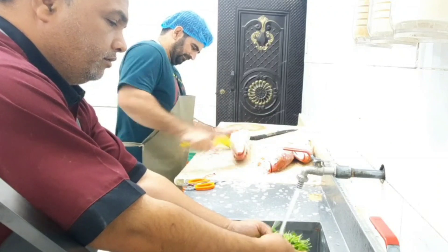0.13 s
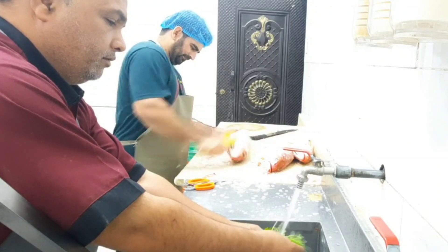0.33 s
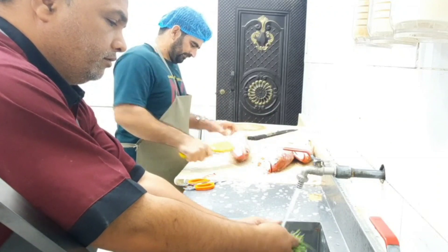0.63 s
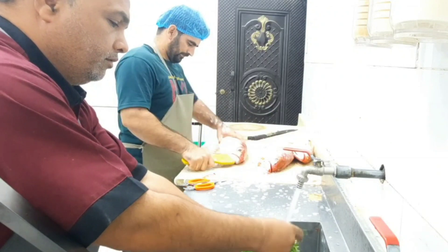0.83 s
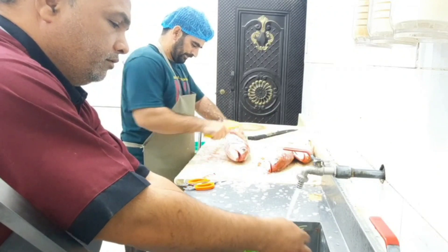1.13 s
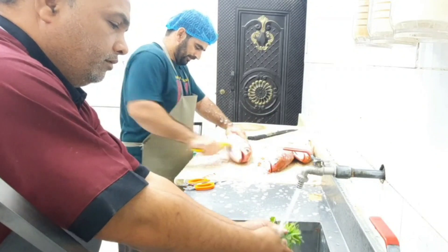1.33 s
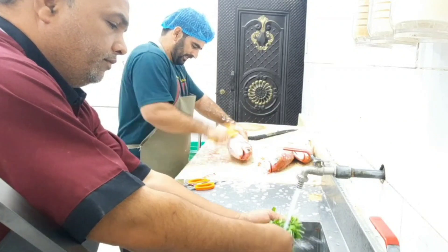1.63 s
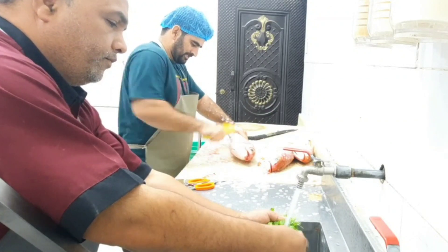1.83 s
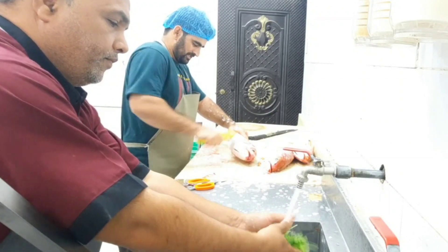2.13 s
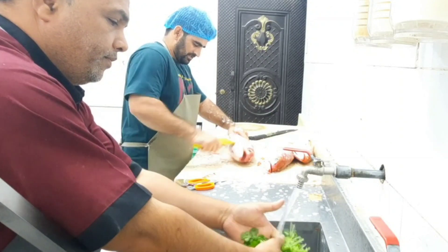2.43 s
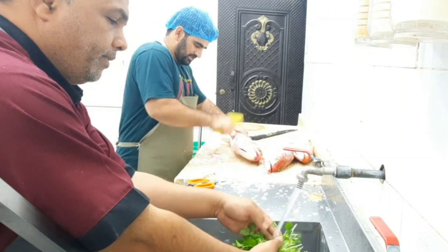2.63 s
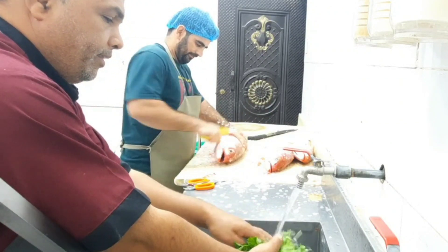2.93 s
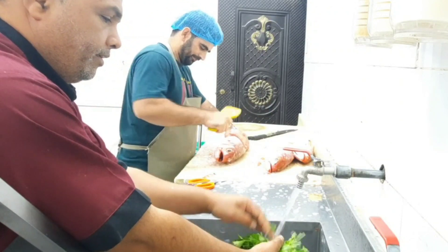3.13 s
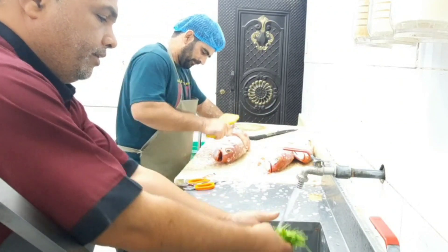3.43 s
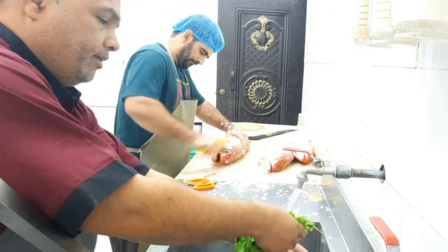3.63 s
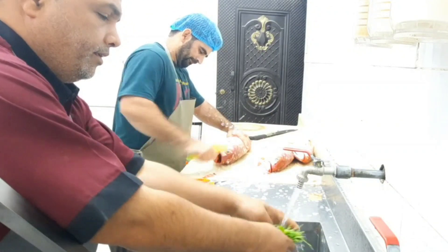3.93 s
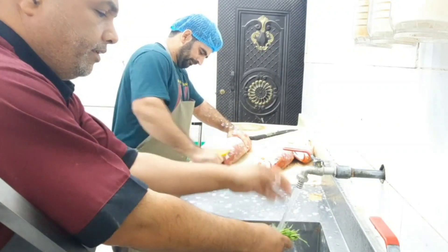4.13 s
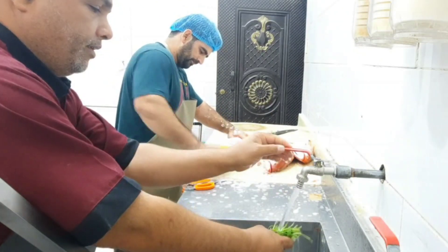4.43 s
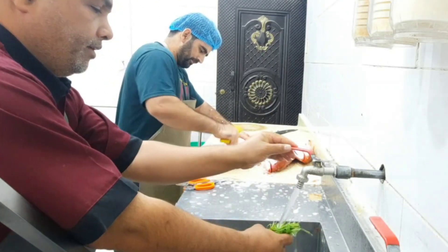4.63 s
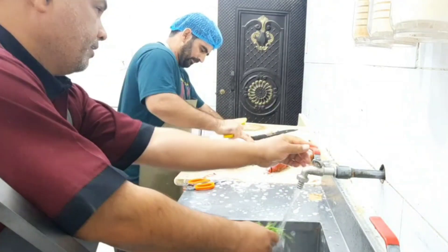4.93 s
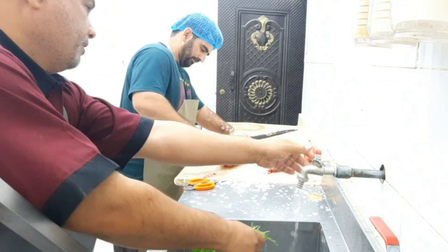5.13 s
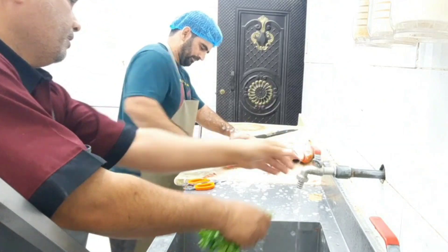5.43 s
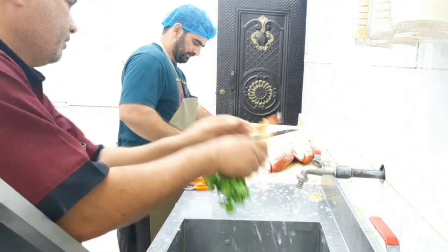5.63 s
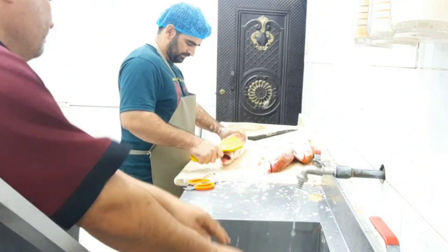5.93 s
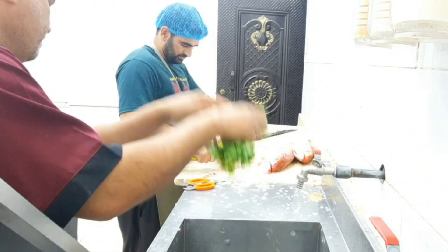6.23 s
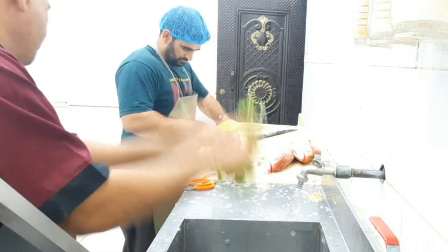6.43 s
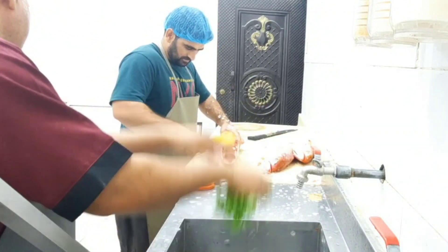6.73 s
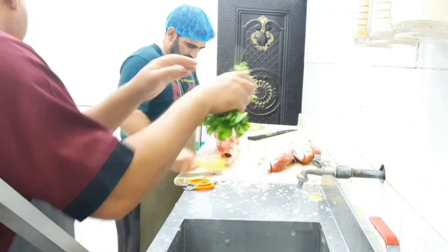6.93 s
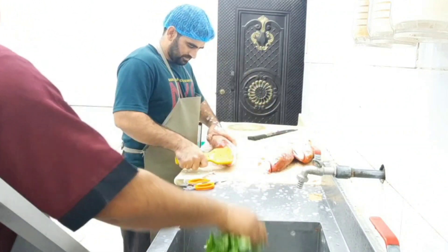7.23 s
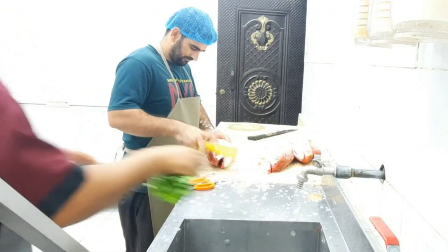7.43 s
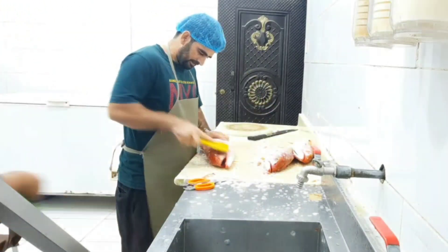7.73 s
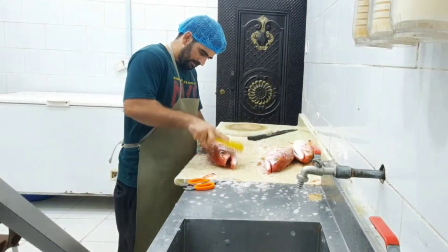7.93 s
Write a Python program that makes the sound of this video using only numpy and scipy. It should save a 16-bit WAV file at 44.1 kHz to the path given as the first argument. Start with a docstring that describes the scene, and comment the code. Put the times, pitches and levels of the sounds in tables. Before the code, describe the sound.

In a hard tiled room, running water patters and gurgles beside raspy fish-scaling strokes and thudding blows, then dribbles away before bursts of flung droplets.

```python
"""In a tiled fish shop a tap runs over a bunch of herbs into a steel sink, is shut, and the herbs are shaken dry.
Further off a hand scaler rasps and strikes a fish on a cutting board, and the table under it thuds.
A freezer hums over a low rush; a faint thin whistle comes late; a small microphone with a bright peak hears it all.
Water and scales are random clicks and damped sines, played through resonances and spectra.
The hard walls are decaying noise that rings on after every stroke."""
import sys
import numpy as np
from scipy import signal
from scipy.fft import rfft, irfft, next_fast_len
from scipy.io import wavfile
from scipy.ndimage import map_coordinates

SR = 44100
rng = np.random.default_rng(int(sys.argv[2]) if len(sys.argv) > 2 else 0)


def unload_wav(signal):
    """Save mono or channel-first audio to the path in sys.argv[1] as 16-bit WAV at rate SR, clipped to [-1, 1]."""
    wavfile.write(
        sys.argv[1],
        SR,
        np.round(np.clip(np.atleast_2d(signal).T, -1, 1) * 32767).astype(np.int16),
    )


N = 356769
TIME = np.arange(N) / SR
FREQS = np.fft.rfftfreq(8192, 1 / SR)

# resonances of the cutting board: pitch_hz, width_hz, level_db
BOARD_MODES = [(465, 41, -0.5), (670, 77, 4), (835, 110, 3.5), (1114, 178, 2), (1457, 510, -1.5),
               (1925, 580, -2.5), (2710, 300, -6.5)]
# resonances of the table top and frame: pitch_hz, width_hz, level_db
TABLE_MODES = [(55.5, 28, 1.5), (91.5, 50, 2), (148, 41, 1), (199.5, 32, 1.5), (245.3, 36, -2),
               (348, 77, -11), (440, 130, -15.5)]
# spectrum of teeth cracking on scales: freq_hz, level_db (per Hz)
CRACK_SPECTRUM = [(100, -21), (1000, -18.5), (3000, -26), (5000, -8.5), (8500, -4), (11000, -14),
                  (15000, -9)]
# spectrum of splashing water: freq_hz, level_db (per Hz)
SPLASH_SPECTRUM = [(100, -10), (400, -3.5), (800, 0), (2000, -7), (3500, -4), (6000, 3), (8000, 2),
                   (11000, -5.5), (15000, 3)]

# a pull with a rasp of FIRM_DB tears this many scales a second; the rate doubles every TEARS_DOUBLE_DB
TEARS_PER_S, FIRM_DB, TEARS_DOUBLE_DB, BOARD_UNDER_RASP_DB = 3200, -47, 6, -9
# the first bite of a pull, relative to its rasp; BITE_GROWS is dB more per dB of rasp, so a soft pull hardly bites
BITE_S, BITE_DB, BITE_GROWS = .006, 1, .5
TUG_TILT_DB = 1.5  # per octave: quick tugs favour the higher modes of the table
SNAP_HZ, SNAP_CYCLES = 8680, 2.26  # a snap decays to 1/e in this many cycles
KNOCK_WIDTH = 0.29  # bandwidth of the hollow knock over its pitch
SLAP_DB, BOARD_DB, THUD_DB = -1, 1.5, -4  # wet flesh, board and table, relative to the force of a blow
HEAVIEST_THUD_DB = -44  # the flesh cushions anything heavier
# the short drag after a blow
DRAG_AFTER_S, DRAG_S, DRAG_FADE_DB, DRAG_TILT_DB, DRAG_TEARS_PER_S = .014, 0.029, 3.5, 1, 1600
DRAG_BOARD_DB, DRAG_TABLE_DB = -13.5, -18  # relative to the force of the blow
SPLASH_DB, TINKLE_DB, DRUM_DB, GURGLE_DB = -3.5, -13, -8.5, -3  # share of each layer of the stream
SMALL_DROP_DB, SMALL_DROP_RANGE_DB = 5, 7  # the largest random drop over the splash, and the range below it
SMALL_DROP_HZ, SMALL_DROP_OCTAVES = 7000, 0.96  # middle pitch and full range
SPAT_S, SPAT_WIDTH, SPAT_FADE_DB_PER_S = .0047, 0.41, 900  # one drop: length, bandwidth over pitch, decay
BLIP_CYCLES, BLIP_RISE = 7.8, 0.066  # cycles to decay to 1/e, and the glide of a bubble
SPRAY_RISE_S, SLOSH_AFTER_S, SLOSH_S = 0.0047, 0.041, 0.015  # fine drops swell first; the bulk lands later
SIDE_DB = -61  # how much the two channels differ
TOP_HZ = 15900  # nothing passes the microphone from here up


def amp(db):
    """Decibels to gain."""
    return 10 ** (np.asarray(db) / 20)


def unit(x):
    """Scaled to rms 1."""
    return x / np.sqrt(np.mean(x ** 2) + 1e-20)


def lasting(x, seconds):
    """Scaled to the energy of an rms-1 sound of that length."""
    return x * np.sqrt(seconds * SR / (np.sum(x ** 2) + 1e-20))


def along(points, hz):
    """(Hz, value) points read on a log frequency axis."""
    f, v = np.transpose(points)
    return np.interp(np.log(hz + 1), np.log(f + 1), v)


def tilted(points, tilt_db):
    """A spectrum leaned by tilt_db an octave, pivoting at the sample rate."""
    return [(hz, db + tilt_db * np.log2(hz / SR)) for hz, db in points]


def wobble(rate):
    """A smooth random curve, rate knots a second, mirrored once its 400 knots run out."""
    return map_coordinates(rng.standard_normal(400), [TIME * rate], mode="mirror")


def colour(points):
    """Causal, minimum-phase impulse response with the given spectrum."""
    cepstrum = irfft(np.log(amp(along(points, FREQS))))
    half = len(cepstrum) // 2
    cepstrum[1:half] *= 2
    cepstrum[half + 1:] = 0
    return irfft(np.exp(rfft(cepstrum)))


def body(modes):
    """Impulse response of a set of resonances, with alternating signs."""
    response = 0
    for k, (hz, width, db) in enumerate(modes):
        damping = 1j * FREQS * width
        response = response + (-1) ** k * amp(db) * damping / (hz * hz - FREQS ** 2 + damping)
    return irfft(response)


def through(x, response):
    """x played through an impulse response."""
    return signal.fftconvolve(x, response)


def add(track, s, x):
    """Mix x into the track at time s."""
    start = int(np.clip(round(s * SR), 0, N - 1))
    track[start:start + len(x)] += x[:N - start]


def clicks(size, rate, spread_db):
    """Random impulses of log-normal strength, capped at two spreads, rate a second."""
    chance, strength = rng.random(size), rng.standard_normal(size)
    signs = rng.choice([-1, 1], size)
    return (chance < rate / SR) * signs * amp(spread_db * np.minimum(strength, 2))


def burst(length, fade_db, rate, spread_db):
    """A run of clicks that fades along its length (a negative fade swells) and then dies quickly."""
    t = np.arange(SR // 5) / SR
    fade = amp(-fade_db * np.minimum(t / length, 1))
    end = np.exp(-np.maximum(t - length, 0) / 0.004)
    return clicks(len(t), rate, spread_db) * fade * end


def ping(hz, cycles, glide):
    """Damped sines, one row per pitch, that fall to 1/e every so many cycles; glide lifts their pitch."""
    t = np.arange(SR // 30) / SR
    hz = np.reshape(hz, (-1, 1))
    age = t * hz / cycles
    wave = np.sin(2 * np.pi * hz * t * (1 + glide * np.minimum(age, 2)))
    return wave * np.exp(-age) * (1 - np.exp(-4 * age))


def room(x, wet_db, direct=(1,)):
    """Direct sound plus the tiles' answer: noise decaying at each pitch's own rate, a little held back at first."""
    # reverberation of the tiles: freq_hz, t60_s
    tile_decay = [(100, 0.52), (260, 0.92), (700, 0.56), (1800, 0.75), (4800, 0.63), (8500, 0.45),
                  (14000, 0.28)]
    hz, t, z = signal.stft(rng.standard_normal(SR), SR, nperseg=256)
    decay = amp(-60 * t / along(tile_decay, hz)[:, None])
    tail = signal.istft(z * decay, SR, nperseg=256)[1]
    tail *= 1 - 0.077 * np.exp(-np.arange(len(tail)) / SR / 0.049)
    response = amp(wet_db) * tail / np.linalg.norm(tail)
    response[:len(direct)] += direct
    return through(x, response)[:N]


def flow(t):
    """Levels of the splash and the gurgle at times t, in dB, before each layer's share."""
    # the stream while the tap runs: time_s, splash_db, gurgle_db
    running = [(0.0, -52, -56), (0.09, -54, -54.5), (0.84, -54, -68.5), (1.28, -55, -59.5),
               (1.49, -51.5, -60.5), (1.78, -54, -71), (2.33, -53, -60.5), (2.59, -57, -69),
               (3.6, -53, -65), (3.75, -54.5, -61), (4.03, -50.5, -65), (4.49, -61, -62.5), (5.1, -50, -63),
               (5.32, -50, -58.5), (5.5, -52, -69)]
    # the dribble once it is shut: time_s, splash_db, gurgle_db
    dribbling = [(5.68, -61, -68.5), (6.54, -78.5, -82), (6.88, -72, -75), (7.36, -68.5, -78.5),
                 (7.7, -70.5, -78.5), (8.09, -66, -84)]
    s, *levels = np.transpose([*running, *dribbling])
    return [np.interp(t, s, level) for level in levels]


def bubbling(count, hz, spread, cycles):
    """Bubbles of random time, size and pitch, rms 1."""
    out = np.zeros(N)
    when = rng.random(count) * N / SR
    pitch, size = rng.standard_normal((2, count))
    rings = ping(hz * np.exp(spread * np.clip(pitch, -2, 2)), cycles, glide=.02)
    gains = amp(3.5 * np.minimum(size, 2))
    for start, gain, ring in zip(when, gains, rings):
        add(out, start, gain * ring)
    return unit(out)


def tap():
    """The stream breaks into clumps of droplets, traps bubbles between the leaves and drums on the basin."""
    # spectrum of the basin under the stream: freq_hz, level_db (per Hz)
    drum_spectrum = [(25, -50), (50, -3), (90, -4), (140, -10), (220, -30.5), (450, -25), (800, -36)]
    splash_db, gurgle_db = flow(TIME)
    clumps = amp(3.16 * wobble(rate=32) + 4.2 * wobble(rate=150))
    droplets = clicks(N, rate=4000, spread_db=2.5) * clumps
    splash = amp(splash_db + SPLASH_DB) * unit(through(droplets, colour(SPLASH_SPECTRUM))[:N])
    # small bubbles tinkle, large ones gurgle
    tinkle = amp(splash_db + TINKLE_DB) * bubbling(count=1200, hz=6600, spread=.2, cycles=5)
    gurgle = amp(gurgle_db + GURGLE_DB) * bubbling(count=2600, hz=1700, spread=.4, cycles=3.5)
    hits = clicks(N, rate=550, spread_db=4.5)
    drum = amp(splash_db + DRUM_DB) * unit(through(hits, colour(drum_spectrum))[:N])
    return room(splash + tinkle, wet_db=-5.0) + room(gurgle, wet_db=-5.0) + drum


def freezer():
    """Motor hum, unsteady in level and phase, over the low rush of the shop."""
    # hum of the motor: pitch_hz, level_db (rms)
    hum_tones = [(58, -76), (120, -74), (232, -78.5)]
    # spectrum of the rush: freq_hz, level_db (per Hz)
    rush_spectrum = [(20, -23), (35, -1.5), (55, -1.5), (80, -5), (130, -2), (230, -13), (400, -14.5),
                     (600, -25.5), (1500, -40.5), (4000, -32.5), (15000, -32)]
    hum = np.zeros(N)
    for hz, db in hum_tones:
        level = amp(db + 0.91 * wobble(rate=2.3)) * np.sqrt(2)
        hum += level * np.sin(2 * np.pi * hz * TIME + .5 * wobble(rate=6.5))
    rush = unit(through(rng.standard_normal(N), colour(rush_spectrum))[:N])
    return hum + amp(-65.5) * rush


def scrape(length, fade_db, tilt_db, rate, rasp_db, board_db, table_db):
    """Teeth tear through rows of scales; their tugging shakes board and table."""
    # spectrum of tearing scales: freq_hz, level_db (per Hz)
    rasp_spectrum = [(100, -29), (600, -12), (1400, -7.5), (3000, -7), (5500, 4), (8500, -1), (11000, -4.5),
                     (15000, -0.5)]
    rasp = colour(tilted(rasp_spectrum, tilt_db))
    tears = through(burst(length, fade_db, rate, spread_db=9), rasp)
    tugs = burst(length, fade_db, rate=2500, spread_db=2)
    tugged_table = [(hz, width, db + TUG_TILT_DB * np.log2(hz / SR)) for hz, width, db in TABLE_MODES]
    board = amp(board_db) * lasting(through(tugs, body(BOARD_MODES)), length)
    table = amp(table_db) * lasting(through(tugs, body(tugged_table)), length)
    return room(amp(rasp_db) * lasting(tears, length), wet_db=2.5) + room(board + table, wet_db=0.0)


def strokes():
    """Long pulls along the fish: the teeth bite with a short crack; the firmer the pull, the denser the rasp."""
    # pulls of the scaler, levels before the room:
    # start_s, length_s, rasp_db, table_db, fade_db (over the stroke), tilt_db (per octave)
    pulls = [(.034, 0.073, -46, -51, 0, -1.5), (.3655, 0.073, -47.5, -51.5, -1, -1),
             (1.322, 0.062, -47, -50.5, 1, 5), (1.692, 0.037, -49, -46.5, -9.5, -1),
             (2.034, 0.046, -48.5, -49.5, 9, 1), (2.355, 0.06, -52.5, -46, 13, -2),
             (2.719, 0.075, -56.5, -50.5, 3, 0.5), (7.778, 0.1, -54.5, -69, -4, 3.5)]
    out = np.zeros(N)
    for s, length, rasp_db, table_db, fade_db, tilt_db in pulls:
        rate = TEARS_PER_S * 2 ** ((rasp_db - FIRM_DB) / TEARS_DOUBLE_DB)
        board_db = rasp_db + BOARD_UNDER_RASP_DB
        add(out, s, scrape(length, fade_db, tilt_db, rate, rasp_db, board_db, table_db))
        bite = through(burst(BITE_S, fade_db=1, rate=8000, spread_db=-1), colour(CRACK_SPECTRUM))
        bite_db = rasp_db + min(fade_db, 0) + BITE_DB + BITE_GROWS * (rasp_db - FIRM_DB)
        add(out, s, room(amp(bite_db) * lasting(bite, BITE_S), wet_db=2))
    return out


def small_drops(count):
    """Drops at random times, their level following the stream: rows of start_s, level_db, pitch_hz."""
    place, size, pitch = rng.random((count, 3)).T
    s = (np.arange(count) + place) / count * N / SR
    db = flow(s)[0] + SMALL_DROP_DB - SMALL_DROP_RANGE_DB * size
    return np.transpose([s, db, SMALL_DROP_HZ * 2 ** (SMALL_DROP_OCTAVES * (pitch - .5))])


def drops():
    """A near drop spatters for a few milliseconds: clicks through a doubled resonance."""
    # the loudest drops in the sink: start_s, level_db, pitch_hz
    loud_drops = [(1.284, -43.5, 4840), (1.554, -47, 7200), (1.867, -45.5, 7960), (2.5592, -42, 5500),
                  (2.8815, -44, 5600), (2.952, -43.5, 5360), (2.9968, -45, 6200), (3.289, -46, 5030),
                  (3.445, -48, 8100), (4.066, -44.5, 6640), (5.244, -40, 5060), (6.129, -50.5, 6570)]
    out = np.zeros(N)
    for s, db, hz in [*loud_drops, *small_drops(count=40)]:
        ring = body([(hz, hz * SPAT_WIDTH, 0)])
        spat = through(burst(SPAT_S, fade_db=0.5, rate=7500, spread_db=-2.5), through(ring, ring))
        spat *= amp(-SPAT_FADE_DB_PER_S * np.arange(len(spat)) / SR)
        add(out, s, amp(db) * lasting(spat, 0.0019))
    return room(out, wet_db=-7.5)


def snaps():
    """A stiff scale lets go with one tiny click, a very short damped sine."""
    # the loudest single scales: start_s, level_db
    loud_scales = [(.1017, -28), (0.404, -24), (.415, -26), (1.71, -23), (1.718, -18), (2.0492, -25.5),
                   (3.8608, -21.5), (7.5702, -44), (7.876, -24)]
    out = np.zeros(N)
    for s, db in loud_scales:
        add(out, s, amp(db) * ping(SNAP_HZ, SNAP_CYCLES, glide=0)[0])
    return room(out, wet_db=-2.5)


def blips():
    """A trapped bubble close by rings with a rising pitch."""
    # the clearest bubbles and drips: start_s, level_db (before its decay), pitch_hz (before its rise)
    clear_bubbles = [(.976, -39, 2000), (1.019, -45, 3060), (1.108, -47, 1160), (2.232, -46.5, 903),
                     (2.821, -44.5, 1170), (3.205, -44.5, 2420), (3.259, -45, 1730), (5.661, -34, 3720),
                     (6.081, -49, 1190)]
    out = np.zeros(N)
    for s, db, hz in clear_bubbles:
        add(out, s, amp(db) * ping(hz, BLIP_CYCLES, BLIP_RISE)[0])
    return room(out, wet_db=-10)


def blows():
    """A crack of teeth on scales, a slap of wet flesh, the board, a knock pitched by the spot, a thud, a short drag."""
    # the scaler lands on the fish: start_s, force_db, crack_db, knock_db, knock_pitch_hz, drag_rasp_db
    landings = [(1.3349, -53, -32, -45, 1026, -42), (3.5463, -33, -37, -34.5, 710, -48.5),
                (3.8469, -39.5, -44.5, -38.5, 1050, -47.5), (4.145, -40, -41, -48, 760, -48.5),
                (4.4147, -37.5, -42, -43.5, 890, -44.5), (4.7319, -43.5, -52, -45.5, 1880, -53.5),
                (5.062, -38, -40.5, -37.5, 810, -46), (5.384, -42, -49.5, -43, 850, -54.5),
                (7.474, -64.5, -68, -64, 1600, -72), (7.778, -58, -59, -44, 800, -56.5)]
    # spectrum of wet flesh: freq_hz, level_db (per Hz)
    slap_spectrum = [(100, -0.5), (400, -7.5), (700, -3.5), (1500, 2), (2400, -1.5), (3600, 1.5), (4800, 4),
                     (6500, -10), (15000, -6)]
    out, contact_s = np.zeros(N), .004
    crack, slap = colour(CRACK_SPECTRUM), colour(slap_spectrum)
    board, table = body(BOARD_MODES), body(TABLE_MODES)
    for s, force_db, crack_db, knock_db, hz, drag_db in landings:
        knock = body([(hz, hz * KNOCK_WIDTH, 0)])
        parts = [(crack, crack_db), (slap, force_db + SLAP_DB), (board, force_db + BOARD_DB),
                 (through(knock, knock), knock_db)]
        for ring, db in parts:
            # the teeth meet the fish one after another within the contact time
            teeth = burst(contact_s, fade_db=11, rate=16000, spread_db=2)
            direct = teeth / np.linalg.norm(teeth)
            add(out, s, room(amp(db) * lasting(ring, contact_s), wet_db=1.0, direct=direct))
        thud_db = min(force_db + THUD_DB, HEAVIEST_THUD_DB)
        add(out, s, room(amp(thud_db) * lasting(table, contact_s), wet_db=1.5))
        drag = scrape(DRAG_S, DRAG_FADE_DB, DRAG_TILT_DB, DRAG_TEARS_PER_S, drag_db,
                      board_db=force_db + DRAG_BOARD_DB, table_db=force_db + DRAG_TABLE_DB)
        add(out, s + DRAG_AFTER_S, drag)
    return out


def sprays():
    """Showers of droplets swell and patter on the sink; the bulk of the water follows and makes its walls ring."""
    # water flung from the herbs: start_s, length_s, level_db, tilt_db (per octave), steel_ring_db
    shakes = [(5.945, 0.067, -50, 2, -65), (6.583, 0.062, -52, 0, -49), (6.901, 0.058, -49, 0.5, -51),
              (7.148, 0.024, -53, 0.5, -80)]
    # resonances of the sink walls: pitch_hz, width_hz, level_db
    steel_modes = [(1100, 400, -10), (1700, 400, -9), (2800, 900, -8), (4600, 800, 0), (5500, 800, 0),
                   (7000, 1100, -3)]
    out, steel = np.zeros(N), body(steel_modes)
    for s, length, db, tilt_db, ring_db in shakes:
        splash = colour(tilted(SPLASH_SPECTRUM, tilt_db))
        patter = burst(length, fade_db=3.5, rate=5600, spread_db=7.0)
        patter *= 1 - np.exp(-np.arange(len(patter)) / SR / SPRAY_RISE_S)
        slosh = burst(SLOSH_S, fade_db=-4, rate=4600, spread_db=5.5)
        shower = amp(db) * lasting(through(patter, splash), length)
        ringing = amp(ring_db) * lasting(through(slosh, steel), SLOSH_S)
        add(out, s, room(shower, wet_db=-1.0))
        add(out, s + SLOSH_AFTER_S, room(ringing, wet_db=1.0))
    return out


def whistle():
    """Two faint thin tones of wavering pitch, one after the other, blurred by the room."""
    # one list of points per tone: time_s, pitch_hz, level_db
    tones = [
        [(6.36, 2700, -93), (6.43, 2720, -94), (6.56, 2650, -104)],
        [(6.66, 2420, -69), (6.8, 2460, -83), (7.1, 2530, -81), (7.24, 2400, -91)],
    ]
    out = np.zeros(N)
    for tone in tones:
        s, hz, db = np.transpose(tone)
        pitch = np.interp(TIME, s, hz) * (1 + 0.0126 * wobble(rate=39))
        level = amp(np.interp(TIME, s, db)) * (TIME > s[0]) * (TIME < s[-1])
        out += level * np.sin(2 * np.pi * np.cumsum(pitch) / SR)
    return room(out, wet_db=3.5)


def scene():
    """Nearly the same sound in both channels; they differ only very faintly."""
    water = tap() + drops() + blips() + sprays()
    fish = strokes() + snaps() + blows()
    mid = water + fish + freezer() + whistle()
    side = room(mid, SIDE_DB, direct=(0,))
    return np.array([mid + side, mid - side])


def record(dry):
    """The microphone's bright peak, then the band limit."""
    # microphone colour: freq_hz, level_db
    mic_response = [(400, -3.5), (560, -6), (750, -2), (2400, 0), (3400, 0.5), (4100, -1), (4800, 0),
                    (6600, 0.5), (8300, 9), (9300, 6), (10500, 3), (12500, -4.5), (15000, -10.5)]
    heard = through(dry, colour(mic_response)[None])
    size = next_fast_len(heard.shape[1])
    passed = np.fft.rfftfreq(size, 1 / SR) < TOP_HZ
    return irfft(rfft(heard, size) * passed, size)[:, :N]


dry = scene()
out = record(dry)
unload_wav(out)
```